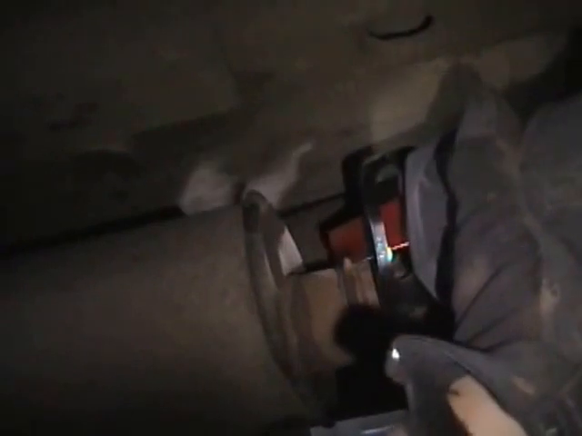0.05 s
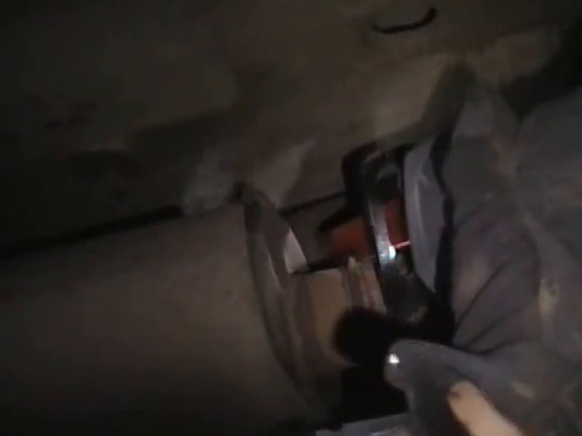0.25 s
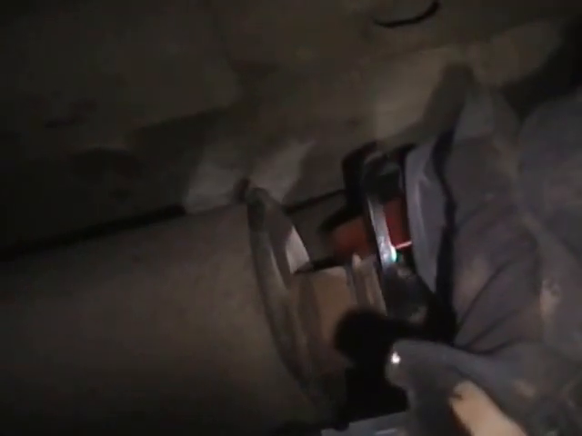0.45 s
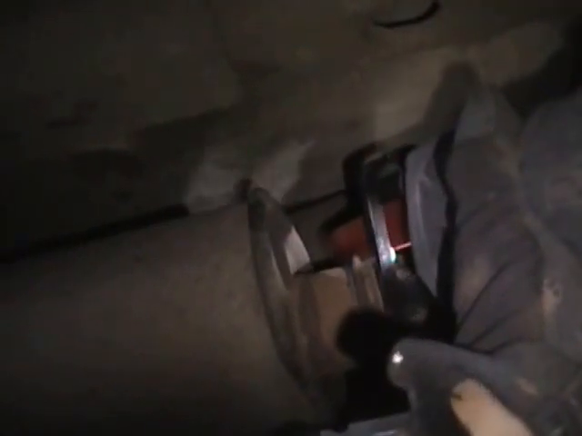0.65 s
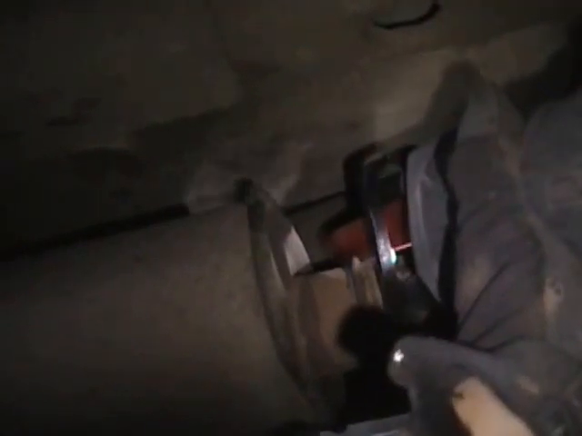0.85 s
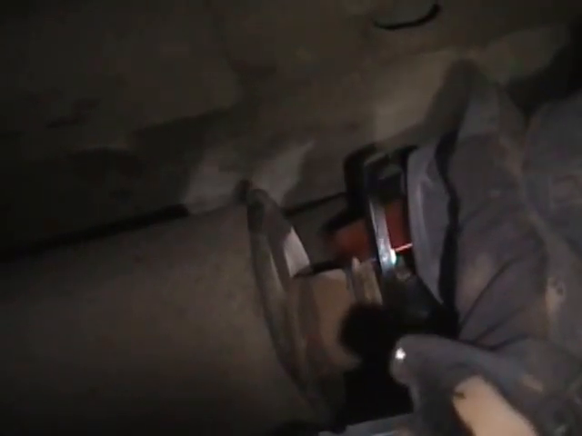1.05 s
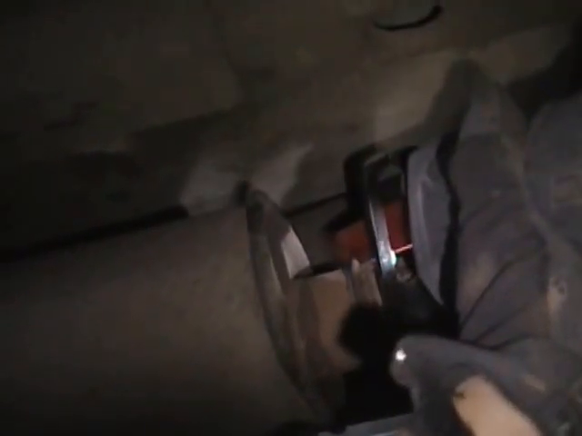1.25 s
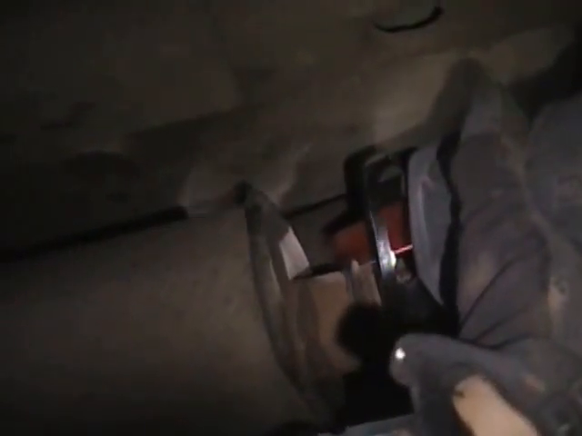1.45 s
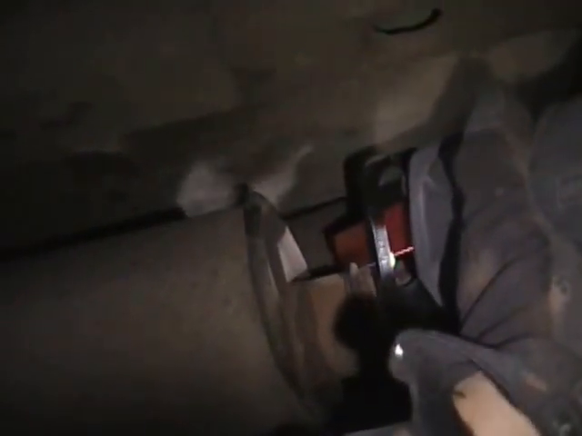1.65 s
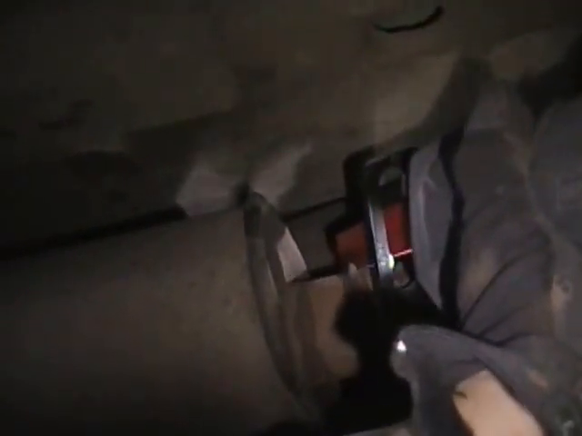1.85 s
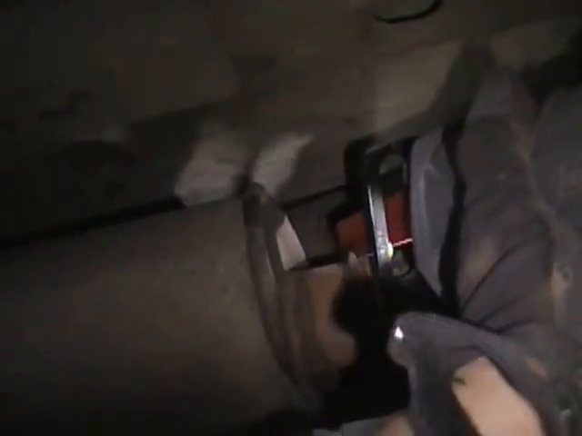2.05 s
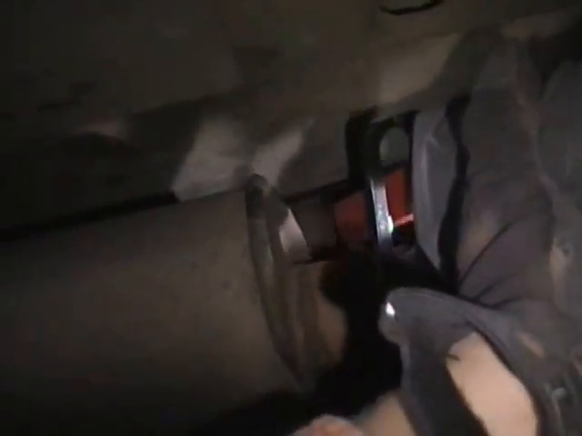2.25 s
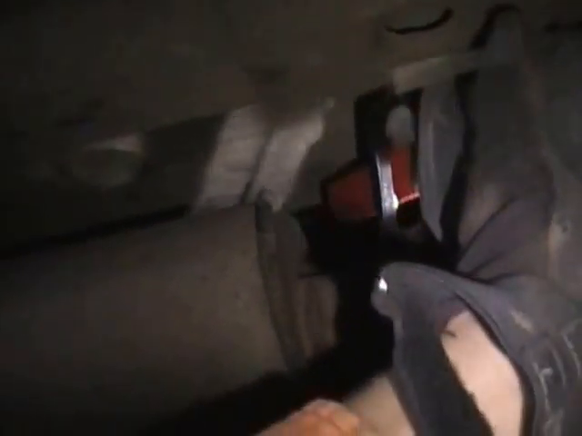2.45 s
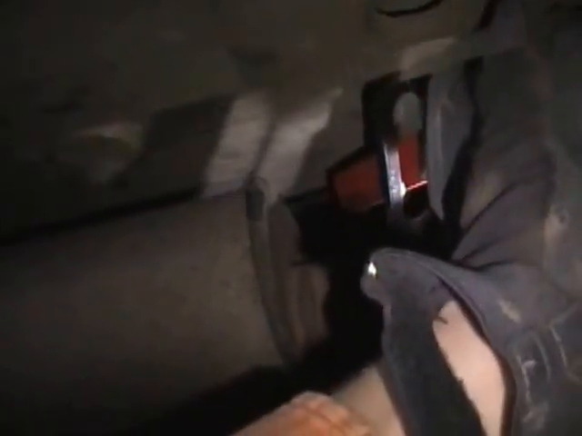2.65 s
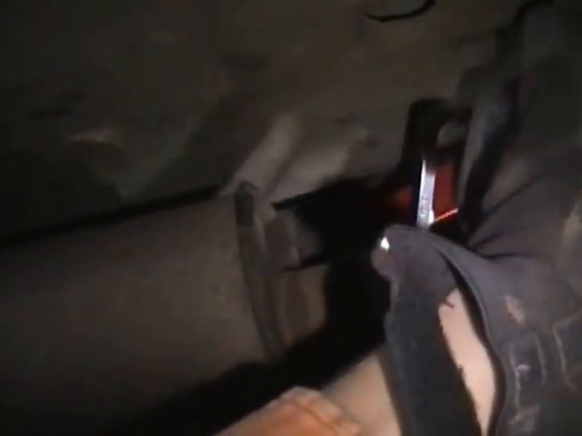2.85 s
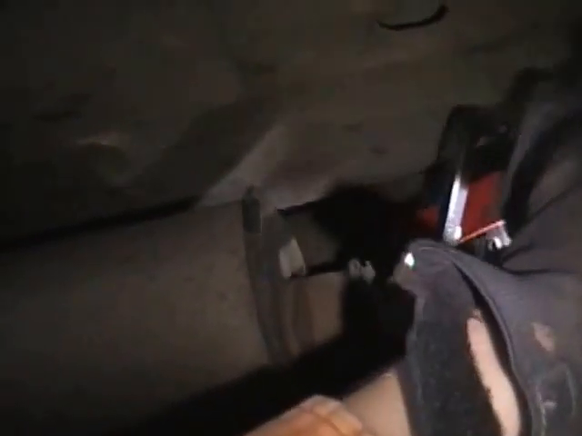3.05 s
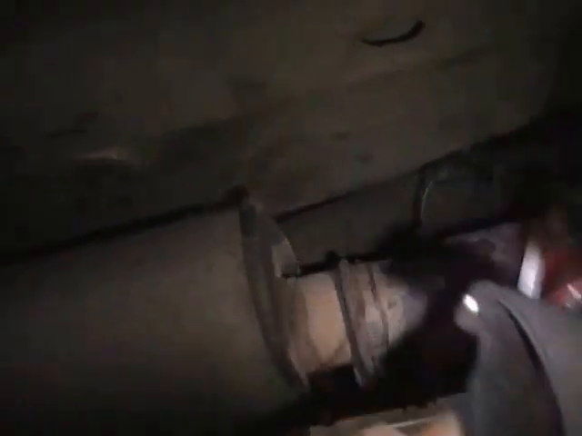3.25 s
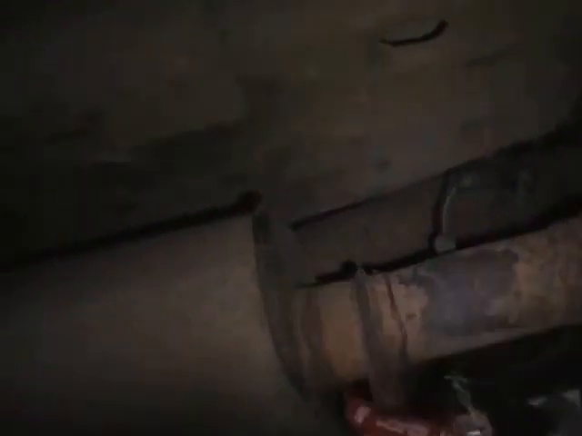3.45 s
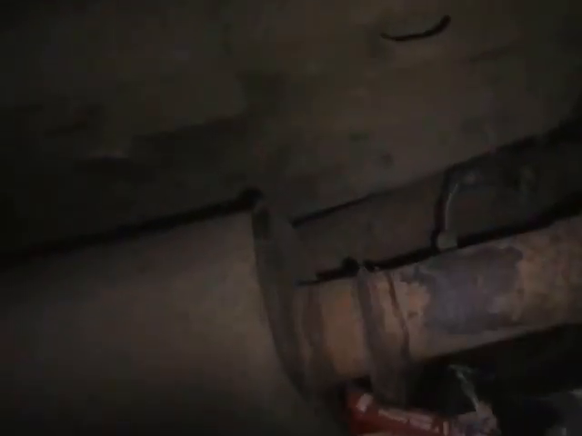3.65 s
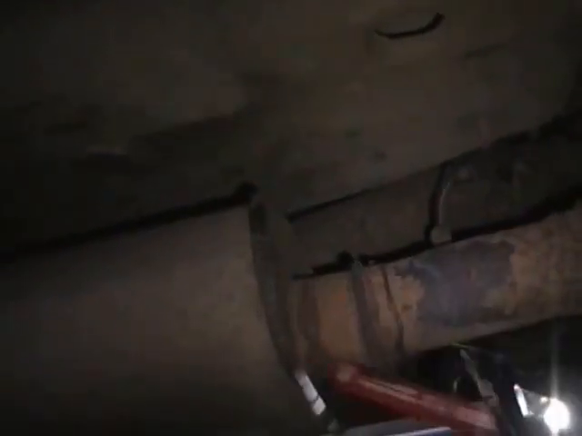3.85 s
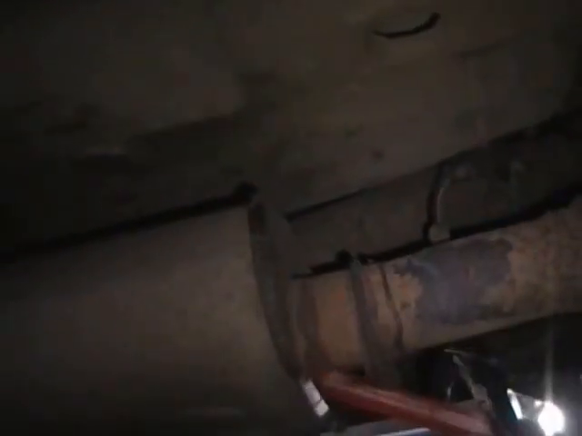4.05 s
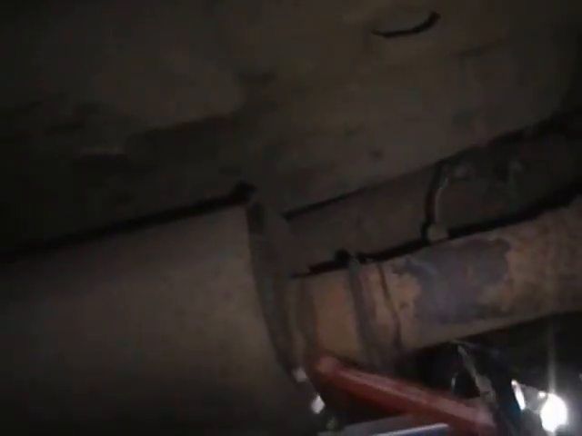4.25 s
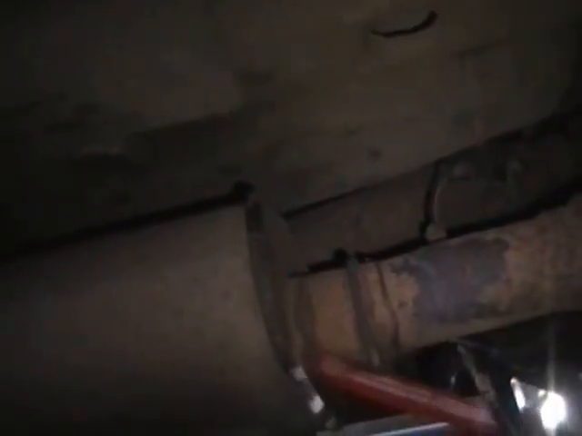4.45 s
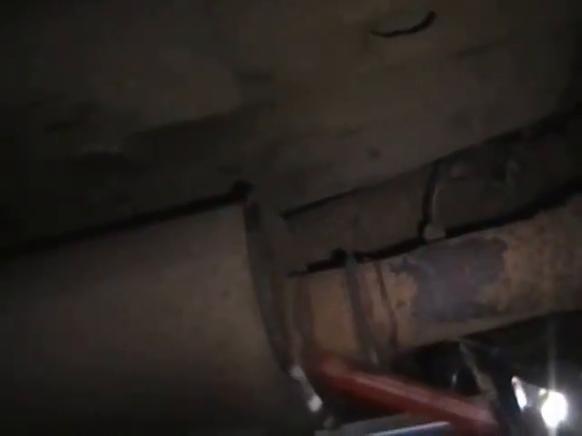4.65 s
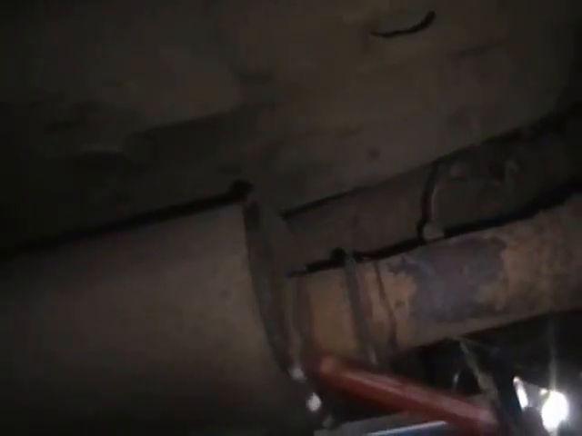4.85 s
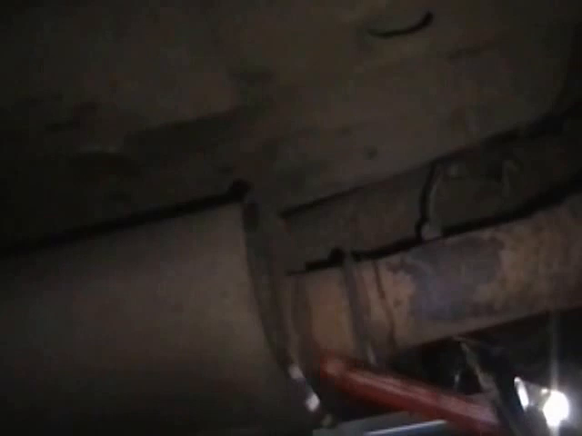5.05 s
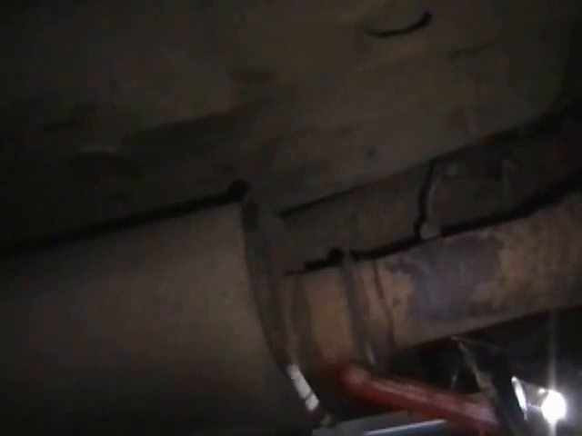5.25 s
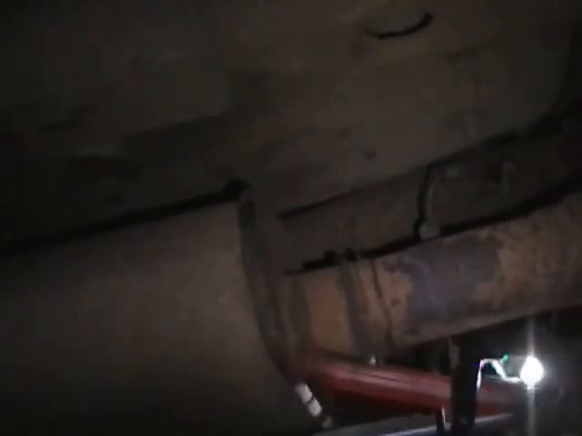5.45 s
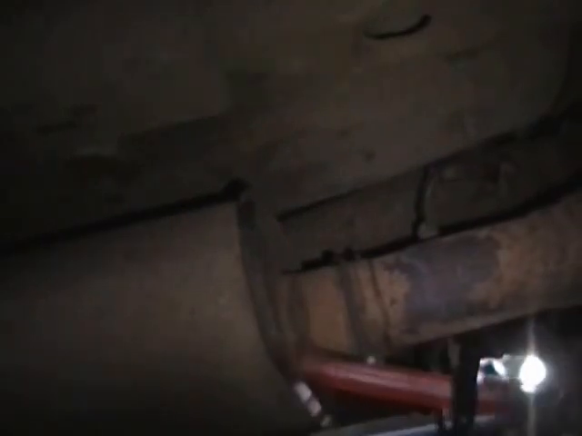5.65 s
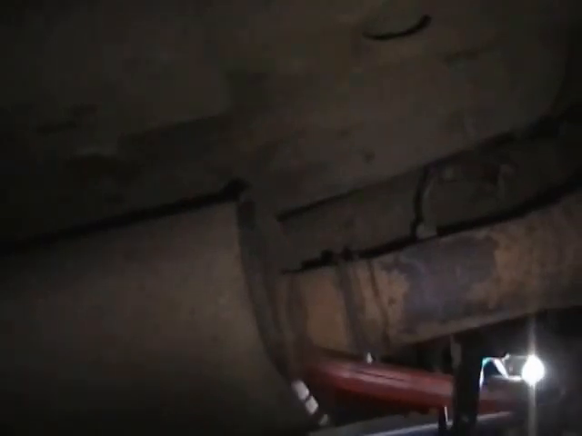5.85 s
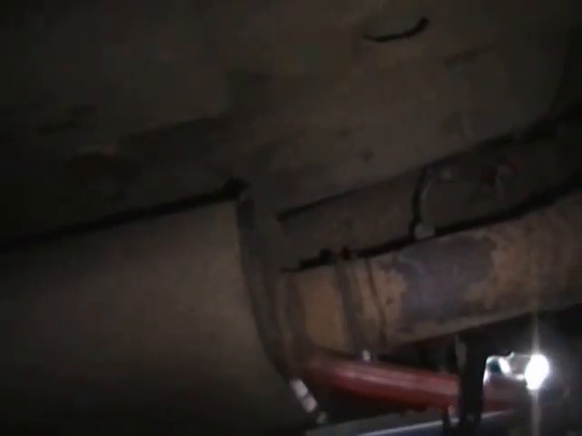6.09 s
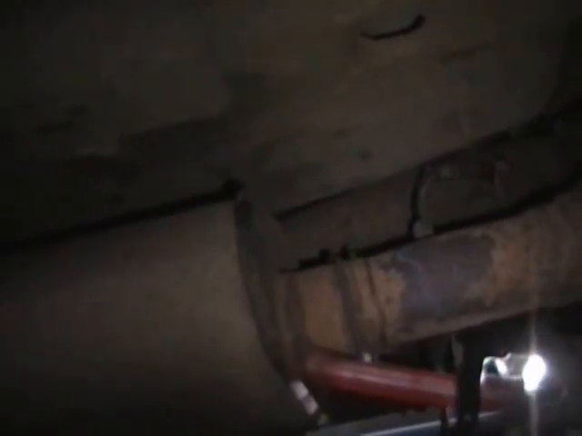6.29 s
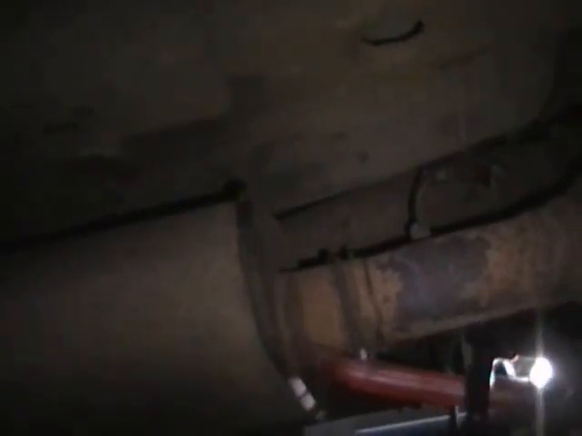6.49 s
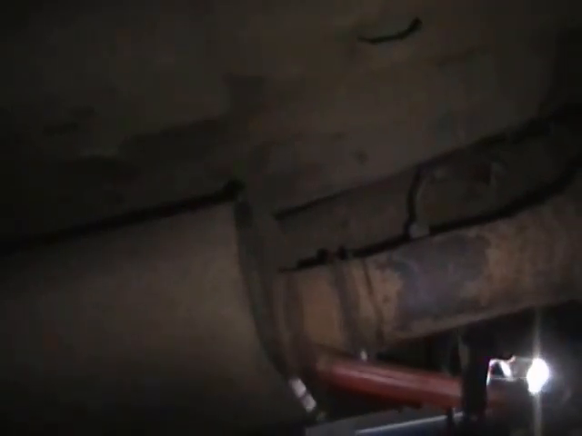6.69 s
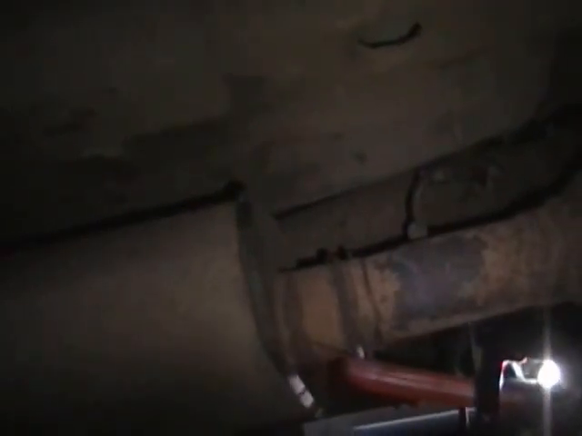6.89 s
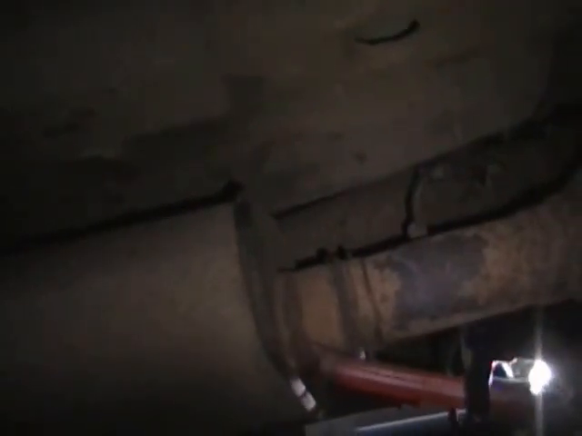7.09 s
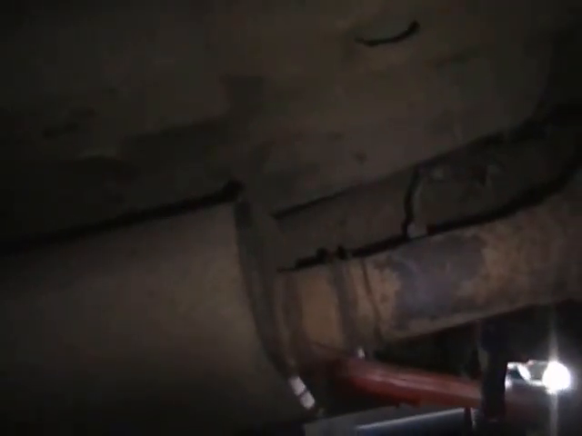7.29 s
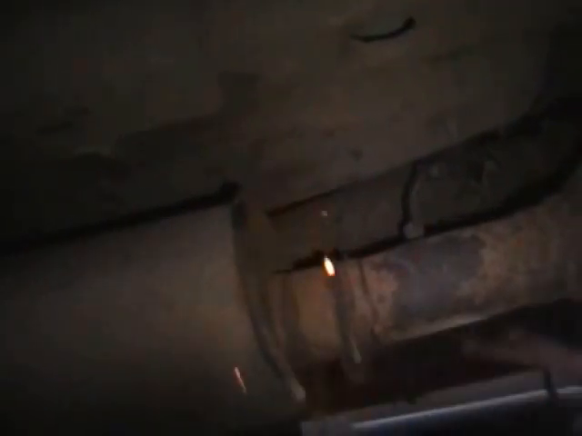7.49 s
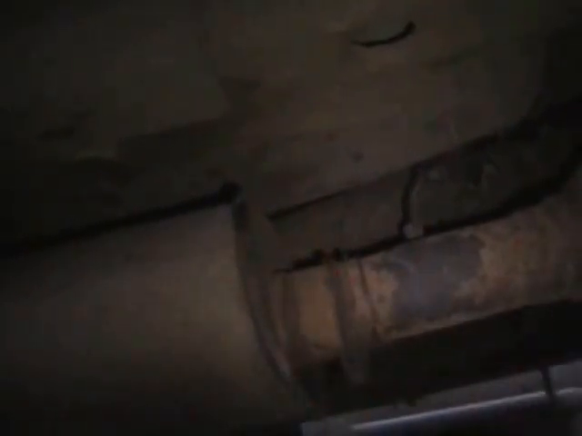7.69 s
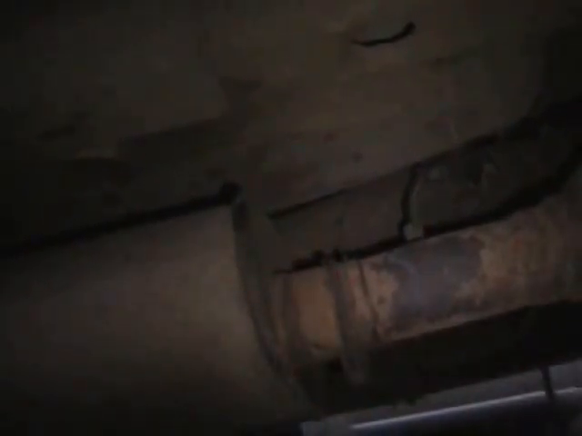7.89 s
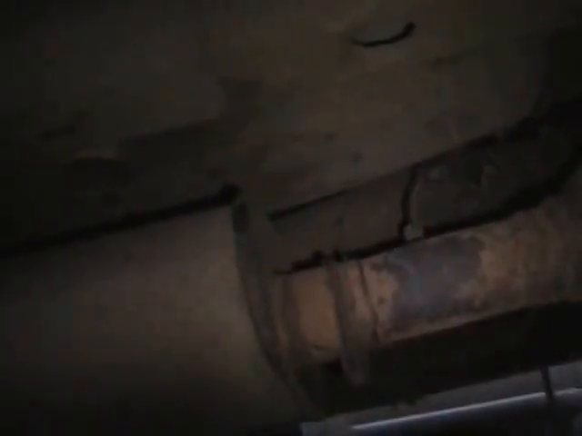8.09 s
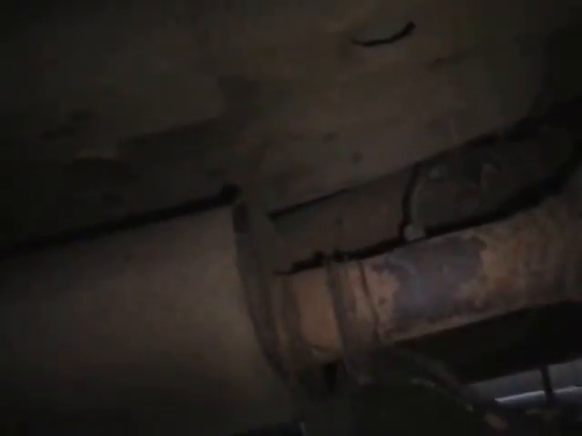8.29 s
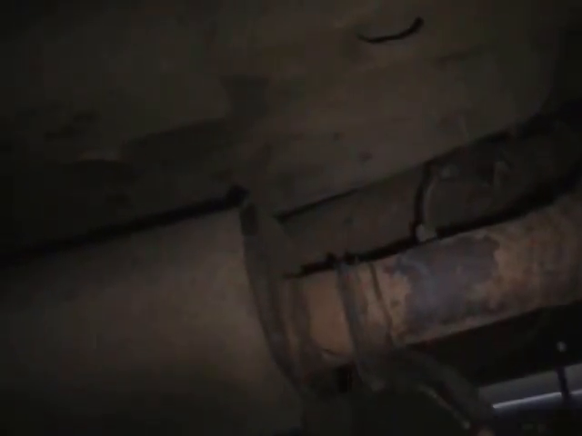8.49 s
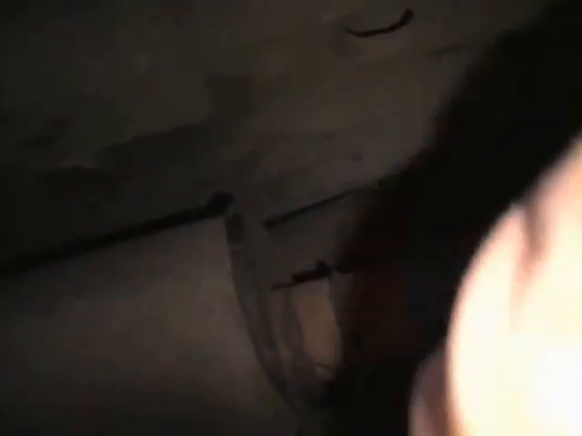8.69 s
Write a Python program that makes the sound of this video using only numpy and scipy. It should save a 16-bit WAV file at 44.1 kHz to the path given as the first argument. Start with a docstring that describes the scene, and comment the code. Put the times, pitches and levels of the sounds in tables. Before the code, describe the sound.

A reciprocating saw cuts an exhaust pipe, heard very near with short reflections from floor and underbody. A bright, buzzing rasp runs for over a second, then a brief second burst. After soft clothing rustles and small clinks, a thin motor whine brings clacking skips and separate raspy bites. A long full-throttle cut shakes the muffler, jolts and breaks through. The motor whirs down, with crumbling rust, scrapes and a loud clank last.

```python
"""Under a car on a garage floor, close up: a reciprocating saw cuts a rusty exhaust pipe.
One long and one short burst, a reset, single rasping strokes, then a race until the blade breaks through.
Stroke-shaped noise excites teeth, wall and muffler colours; the motor hums, whines and coasts down.
Knocks ring pipe modes, clothes rustle as shaped noise, floor and underbody throw the sound back."""
import sys
import numpy as np
from scipy import signal
from scipy.fft import rfft, irfft, next_fast_len
from scipy.io import wavfile
from scipy.ndimage import uniform_filter1d, map_coordinates

SR = 44100
rng = np.random.default_rng(int(sys.argv[2]) if len(sys.argv) > 2 else 0)


def wrap_up_sound(samples):
    """Save the sound to the file named by the first command line argument, as 16-bit audio."""
    columns = np.atleast_2d(samples).T
    # keep every value between -1 and 1, then stretch to whole-number steps
    tamed = np.clip(columns, -1, 1)
    steps = np.round(tamed * 32767).astype(np.int16)
    wavfile.write(sys.argv[1], SR, steps)


N = 384993

# Full-throttle runs: [trigger t/s, release t/s, peak of one pull t/s, coasting time constant/s,
# lift-off time to -60 dB/s]
RUN_FIRST = (0.22, 1.4714, 0.8945, 0.11, 0.13)
RUN_SHORT = (1.783, 2.005, 1.9417, 0.11, 0.13)
RUN_LAST = (5.485, 7.442, 6.4958, 0.17, 0.3)
# Crank rate at full speed: [t/s, f/Hz]
CRANK_FIRST = [(0.53, 42.35), (0.77, 41.08), (1.0, 41.98), (1.24, 41.59), (1.47, 42.23)]
CRANK_SHORT = [(1.85, 36.3), (2.03, 40.1)]
CRANK_LAST = [(5.75, 37.88), (5.93, 37.45), (6.12, 37.82), (6.49, 37.97), (6.68, 37.48), (6.86, 37.33),
              (7.05, 37.95), (7.23, 37.81), (7.42, 36.7)]
# Hand pressure on the cut: [t/s, level/dB]
PRESS_FIRST = [(0.28, -21), (0.446, -19), (0.526, -21), (1.21, -22), (1.22, -15.5), (1.24, -24),
               (1.46, -23)]
PRESS_SHORT = [(1.87, -21.5), (1.944, -18.5), (2.02, -20.5)]
PRESS_LAST = [(5.55, -17.5), (5.66, -20.5), (5.82, -20.5), (6.14, -23), (6.32, -20), (6.42, -23),
              (6.87, -22.5), (6.95, -19.5), (7.08, -22), (7.17, -19.5), (7.23, -23), (7.32, -21.5),
              (7.355, -16.5), (7.425, -20), (7.44, -25)]
# Colour of the teeth, at the surface, in slow strokes and deep in the cut: [f/Hz, level/dB]
TEETH_FIRST = [(1710, -47.5), (2900, 2), (3630, 3.5), (5010, -6.5), (5920, 4.5), (6430, -0.5), (7200, 3),
               (8250, 0.5), (9130, -1), (9860, -10.5), (10600, -11), (11600, -31), (12000, -44.5),
               (15600, -64), (22000, -120)]
TEETH_SLOW = [(120, -65), (200, -64.5), (445, -18), (694, -11), (1360, -11), (1540, -11), (1850, -3.5),
              (2500, 3), (2780, -5), (3200, -2), (4910, -5.5), (6750, 6.5), (10900, -14.5), (12800, -45.5),
              (14000, -90.5)]
TEETH_LAST = [(1710, -54.5), (2900, 0.5), (3420, -3), (3720, 0.5), (4060, -4.5), (4420, 1), (4880, -1.5),
              (5490, 1.5), (7060, 3), (9060, -1), (11200, -15), (12400, -13.5), (14000, -49.5)]
# Pipe wall resonances, at the two places and when nearly cut through: [f/Hz, width/Hz, level/dB]
WALL_FIRST = [(1540, 330, -10.5), (1848, 100, -2), (1910, 190, -3), (2020, 36, 0.5), (2062, 130, 2.5),
              (2230, 180, -4), (2480, 174, -0.5), (2700, 98, -5.5), (2940, 170, -15)]
WALL_LAST = [(1394, 210, -6.5), (1885, 340, 1.5), (2207, 100, 4), (2375, 67, 6.5), (2580, 220, 5),
             (3020, 100, 4), (3200, 160, -4), (3740, 350, 3)]
WALL_THIN = [(1370, 260, -9), (1835, 167, -1), (2024, 140, -2), (2330, 250, -1.5), (2518, 120, 3.5),
             (2690, 110, 3), (3030, 270, -6), (3320, 100, -9.5), (3800, 45, -5.5)]
# Colour of shaken muffler and saw housing: [f/Hz, level/dB]
SHUDDER = [(76, -62), (130, -52), (172, -44.5), (215, -19.5), (312, -4.5), (372, -0.5), (442, -3), (506, 1),
           (695, -0.5), (765, 1.5), (1000, 0), (1300, -3), (1690, -7), (2860, -120)]
# Dip in the shudder early in the last run: [f/Hz, width/Hz, level/dB]
SHUDDER_DIP = [(1065, 450, -5.5)]
# Hum partials: [multiple of crank rate, mean relative level/dB]
HUM = [(6, 1.5), (7, -12), (8, -1), (10, 5), (11, -4.5), (12, -3), (13, 0), (14, -3.5), (20, 5.5)]
# Hum against shudder: [t/s, level/dB]
HUM_LEVEL = [(2.1, -16), (5.5, -6.5), (5.65, -6), (6.06, -6.5), (6.16, -17), (6.47, -7.5), (6.61, -14),
             (6.8, -8), (7.0, -28.5), (7.19, -11), (7.42, -16)]
# Narrow resonances of the deepening cut: [start t/s, end t/s, f/Hz, width/Hz, level/dB]
SINGING = [(5.52, 6.02, 3625, 90, -35), (5.9, 6.42, 3770, 55, -34.5), (5.55, 6.1, 3186, 70, -38),
           (5.55, 6.45, 2655, 130, -37), (5.7, 6.45, 5650, 180, -36), (5.6, 5.95, 6950, 130, -32)]
# Squeals of the pinched blade: [start t/s, end t/s, f/Hz, width/Hz, level/dB]
SQUEALS = [(7.402, 7.413, 6900, 500, -24), (7.412, 7.427, 7300, 450, -17.5), (7.448, 7.46, 8800, 1500, -23)]
# Slow bites, long on the pull, short on the push:
# [start t/s, rise/s, length/s, relative level/dB, blade ring level/dB]
BITES = [(4.285, 0.0025, .033, -15, -21.5), (4.389, 0.0035, .012, -14, -29.5),
         (4.399, 0.0025, 0.017, -17, -27.5), (4.477, 0.0094, 0.018, -13.5, -25),
         (4.497, .004, .018, -19, -28), (4.537, 0.0018, .008, -19.5, -41.5),
         (4.573, 0.0048, .037, -16.5, -34.5), (4.627, .004, 0.026, -24.5, -32.5),
         (4.657, 0.0024, .015, -18, -28.5), (4.68, .004, 0.036, -18.5, -28),
         (4.73, 0.0051, .032, -20.5, -31.5), (4.774, .022, .04, -17, -25), (4.832, .002, 0.0087, -18, -35),
         (4.853, 0.0045, 0.02, -20, -34), (4.886, 0.0066, .034, -15.5, -28.5),
         (4.94, .003, 0.014, -24, -41), (4.962, .005, .025, -21.5, -30), (4.994, 0.016, 0.037, -15.5, -28),
         (5.069, 0.0024, 0.012, -17, -28.5), (5.084, 0.0027, .012, -23.5, -34.5),
         (5.113, .012, 0.03, -15, -29.5), (5.173, .003, .009, -25.5, -41), (5.191, .002, .014, -23, -37.5),
         (5.222, 0.025, 0.042, -17, -26), (5.28, .005, .036, -28, -42), (5.338, 0.015, 0.034, -15, -35),
         (5.308, 0.0034, .016, -25, -41.5), (5.385, .004, 0.013, -22, -39.5),
         (5.409, .002, 0.0095, -16.5, -36.5), (5.425, .012, .028, -14.5, -40),
         (5.465, .003, 0.0065, -14, -40.5), (5.479, .004, .012, -12, -41),
         (5.511, 0.0048, .013, -16.5, -44)]
# Blade resonances added to the slow teeth colour: [f/Hz, width/Hz, level/dB]
BLADE = [(470, 99, 14.5), (1370, 70, 13.5), (1865, 41, 10.5), (2550, 45, 5), (3210, 170, 6.5),
         (3775, 90, 10), (5750, 110, 3), (6400, 270, -2), (6860, 190, 1)]
# Blade ring after a bite: [f/Hz, width/Hz, relative level/dB]
BLADE_RING = [(2500, 120, -7), (3216, 160, 2), (3770, 130, -8.5)]
# Chatter, first skating, then cutting: [start t/s, end t/s, level/dB, growth/(dB/s)]
CHATTER = [(3.784, 4.286, -39.5, 11.5), (4.287, 4.567, -35, 6), (4.574, 5.513, -30, -2)]
# Colour of the chatter: [f/Hz, level/dB]
CHATTER_COLOUR = [(71, -57), (120, -50), (292, -15), (459, 0.5), (670, -7.5), (997, -3.5), (1690, -1.5),
                  (2160, 4.5), (2980, -1.5), (3220, -5.5), (3540, -6), (4040, -2), (4520, -8.5),
                  (7400, -6.5), (11000, -24.5), (14300, -71.5), (22000, -120)]
# Speed control at part throttle: [start t/s, end t/s, f/Hz, relative level/dB]
WHINE = [(0.215, 0.269, 1936, -46.5), (0.217, 0.271, 3960, -54), (3.777, 3.831, 2030, -40),
         (3.78, 4.3, 3900, -41.5), (4.306, 4.5, 3880, -50), (3.8, 4.297, 7940, -66),
         (3.92, 4.258, 7340, -49.5)]
# Skips of the blade before it catches: [t/s, relative level/dB]
SKIPS = [(3.843, -27.5), (3.889, -26.5), (3.917, -28), (3.942, -28.5), (3.953, -23.5), (3.998, -24),
         (4.013, -28.5), (4.03, -26), (4.07, -23.5), (4.082, -26), (4.101, -35), (4.123, -21.5),
         (4.137, -29), (4.15, -28), (4.166, -28), (4.184, -22), (4.195, -33), (4.21, -23), (4.241, -21),
         (4.266, -22.5)]
# Colour of a skip: [f/Hz, level/dB]
SKIP_COLOUR = [(30, -90.5), (90, -56), (160, -15.5), (300, -10), (480, 2), (670, -8.5), (1000, 6),
               (1650, -10.5), (2160, 8.5), (2600, 4), (2950, -2.5), (3220, 7.5), (3600, -6.5),
               (4500, -16.5), (7400, -1), (11000, -31), (13000, -73.5)]
# Free motor run-downs: [loudest t/s, level/dB, t60/s]
RUN_DOWNS = [(1.57, -50.5, 0.3), (2.099, -65, 0.58), (7.502, -41, 0.52)]
# Colour of the free motor: [f/Hz, level/dB]
MOTOR_COLOUR = [(50, -69.5), (120, -35.5), (220, -14.5), (400, 0.5), (540, 1.5), (700, -15.5), (900, -14),
                (1500, -31.5), (4000, -59)]
# Knocks of saw and blade on the pipe: [t/s, relative level/dB, ring level re that/dB]
KNOCKS = [(1.216, -1.5, -18), (1.749, -43.5, -14), (1.806, -15.5, -26), (2.13, -38, -22), (2.277, -33, -16),
          (2.293, -38, -10), (2.377, -32.5, -25), (2.77, -14, -16), (2.785, -23, -16), (2.925, -31, -6),
          (3.355, -37, -7), (3.787, -19.5, 3.5), (7.336, -7, -12.5), (7.356, -11, -12), (7.378, -12.5, -10),
          (7.413, -16.5, -13), (7.452, -16.5, -6.5), (8.208, -37.5, -5), (8.365, 4, -13.5),
          (8.653, -28.5, 0)]
# Pipe modes rung by a knock: [f/Hz, mean relative level/dB, t60/s]
PIPE = [(440, -17, .16), (495, -15, .26), (822, -12, .13), (1290, -4, .11), (1420, -4, .13),
        (1620, -5, .08), (1810, -1, .075), (1990, -1, .065), (2200, -2, .06), (2450, 2, .07),
        (2660, 2, .07), (2850, 2, .06), (3050, -1, .05), (3270, -5, .05), (4150, -12, .04)]
# Colour of a knock's crack: [f/Hz, level/dB]
CRACK = [(100, -66.5), (200, -25.5), (500, -9.5), (800, -14.5), (1300, -11), (2000, 2), (2900, -1.5),
         (3300, -8), (4000, -12.5), (6100, -9), (8500, -13.5), (11300, -40.5), (13000, -79)]
# Thuds as the saw grabs, speeds up or the loose pipe drops: [t/s, bass level/dB, muffler shell level/dB]
KICKS = [(4.29, -57, -28), (5.527, -46, -31.5), (7.355, -56.5, -35.5), (7.423, -60, -39.5),
         (7.454, -52, -28), (7.483, -50.5, -39), (7.601, -66.5, -45)]
# Colour of a thud's bass: [f/Hz, level/dB]
KICK_COLOUR = [(25, -13), (60, -18), (110, -18.5), (160, 4), (260, 3.5), (500, -30), (1500, -91.5)]
# Single pipe modes ringing on: [start t/s, f/Hz, level/dB, t60/s]
LINGER = [(0, 691, -65.5, 0.94), (1.52, 840, -67.5, 1.4), (8.366, 1180, -44, 0.54)]
# Long modes of the severed pipe: [f/Hz, relative level/dB, t60/s]
AFTER_RING = [(467, -53, 2), (3100, -68, 2.8)]
# Colour of crumbling rust: [f/Hz, level/dB]
CRUMBS_COLOUR = [(100, -50), (1000, -18), (4000, -12), (7000, 0), (12000, -22)]
# Ticks and scratches of trigger, teeth, rust flakes and grit: [t/s, relative level/dB]
TICKS = [(0.197, -25), (1.658, -36), (1.749, -33), (1.804, -12), (2.132, -39), (2.22, -32), (2.234, -33),
         (2.262, -29.5), (2.292, -24), (2.311, -31), (2.329, -33), (2.392, -26), (3.219, -35), (3.838, -14),
         (3.984, -10), (4.049, -8), (4.105, -17), (4.167, -5), (4.582, -7), (4.662, -9.5), (5.058, -11),
         (7.676, -37), (7.693, -30), (7.706, -25), (7.779, -35), (7.819, -23), (7.831, -29), (7.883, -41),
         (7.917, -37), (7.966, -37.5), (8.079, -38), (8.095, -37), (8.161, -30), (8.206, -24), (8.229, -8),
         (8.234, -14), (8.257, -12), (8.262, -12), (8.297, -8), (8.314, -12), (8.357, -2), (8.513, -16),
         (8.585, -13), (8.645, -15), (8.703, -0.5)]
# Colour of a tick: [f/Hz, level/dB]
TICK_COLOUR = [(100, -35), (250, -21.5), (600, -6.5), (2300, -3.5), (4000, -5.5), (7000, 3.5), (9500, -5.5),
               (12500, -37), (14000, -65)]
# Rubs of drawn-out blade, shifted position, sleeves and faint fading saw hiss, slide over the floor:
# [full strength t/s, 20 dB rise/s, hold/s, 20 dB fall/s, hiss level/dB, body level/dB]
WITHDRAW = [(2.245, 0.028, .032, 0.051, -52, -49)]
SHIFT = [(3.355, 0.15, 0.416, .02, -57, -56.5)]
SLEEVE_AND_HISS = [(0.004, .01, .004, 0.059, -73, -60), (1.68, 0.087, 0.13, 0.045, -72.5, -73),
                   (2.377, 0.013, 0.006, 0.028, -55, -51.5), (2.819, 0.88, 0.11, 0.29, -56.5, -59),
                   (2.9, 0.036, 0.048, 0.06, -61, -56), (3.22, 0.089, .08, .1, -65.5, -70)]
SLIDE = [(8.208, .008, 0.14, 0.14, -41.5, -46), (8.232, 0.04, 0.0098, 0.044, -40, -52),
         (8.315, 0.046, .005, 0.0095, -34, -59), (8.39, 0.052, 0.0064, .17, -45, -45),
         (8.512, 0.056, .01, 0.039, -36, -50), (8.565, 0.024, .17, .1, -38.5, -47)]
# Colour of each: [f/Hz, level/dB]
WITHDRAW_COLOUR = [(120, -53), (200, -26), (838, -15), (1170, -40), (1320, -28), (1630, -12), (3000, -6.5),
                   (5330, -15), (7310, -4), (11700, -23), (13000, -45)]
SHIFT_COLOUR = [(35, -56), (60, -36), (156, -8.5), (215, -12.5), (310, -2.5), (437, -7), (536, -6),
                (1040, -13.5), (1640, -5.5), (1970, -11.5), (6900, -5), (10900, -16), (12500, -34),
                (14000, -60.5)]
SLEEVE_AND_HISS_COLOUR = [(40, -31), (70, 0), (130, -2), (215, 0), (320, 6), (500, 1), (700, -0.5),
                          (1000, -5), (1500, -5), (2200, 3), (3100, -8.5), (4000, -10), (5000, -6),
                          (5700, -9.5), (7300, -6), (9700, -8.5), (12500, -26.5), (14000, -48)]
SLIDE_COLOUR = [(59, -64), (100, -40), (154, -6), (346, -1), (481, 4.5), (895, -1), (1850, 1.5),
                (4130, -7.5), (6930, -0.5), (8010, -2), (14000, -27)]
# Colour of the quiet garage: [f/Hz, level/dB]
BACKGROUND = [(25, -41), (110, -24.5), (230, -11), (420, -12.5), (600, -16), (780, -20.5), (1200, -25.5),
              (2200, -24.5), (3100, -23), (3500, -29), (7000, -28.5), (10000, -34), (14000, -57)]
# Stereo side against mid: [f/Hz, level/dB]
WIDTH = [(150, 0), (300, -19), (500, -15.5), (1000, -9.5), (2500, -19), (4500, -11), (6500, -14.5),
         (8500, -4), (12000, -3)]
# Garage decay: [f/Hz, t60/s]
GARAGE = [(200, 0.58), (1000, 0.34), (4000, 0.21), (10000, 0.064)]

SPIN_UP_S, BITE_POWER = .028, 4.26  # the cut grows with this power of the spin-up
PULL_SHARE = .62  # of a turn
CATCH_SHARE, EASE_POWER = .15, 1.6  # catching share of a stroke; steepness of easing off
THIN_S, THINNING_S, THIN_WALL_DB, THIN_SHUDDER_DB = 6.15, 0.74, 3, -2  # little steel is left
BREAK_S, BREAKING_S, BREAK_SHUDDER_DB, BREAK_WALL_DB = 7.395, 0.023, 9, -1  # the blade breaks through
BITE_EASE_DB, LET_GO_S = 5.5, 0.006  # fall over one slow bite; release of the teeth
CRUMBS_DB, CRUMBS_FALL_DB_PER_S = -59, 32
TOP_HZ = 14100


def amp(db):
    """Decibels to amplitude."""
    return 10 ** (np.asarray(db) / 20)


def unit(x):
    """Scale to unit RMS."""
    return x / np.sqrt(np.mean(x ** 2) + 1e-20)


def noise():
    """White Gaussian noise."""
    return rng.standard_normal(N)


def clock():
    """Time axis in seconds."""
    return np.arange(N) / SR


def since(start_s):
    """Seconds gone by after start_s, zero before it."""
    return np.maximum(clock() - start_s, 0)


def over_time(points):
    """Linear curve through (t/s, value) points."""
    return np.interp(clock(), *np.transpose(points))


def along(points, hz):
    """Curve through (f/Hz, value) points on a log axis."""
    f, value = np.transpose(points)
    return np.interp(np.log(hz + 1), np.log(f + 1), value)


def wobble(rate_hz):
    """Smooth random curve with rate_hz knots a second."""
    knots = rng.standard_normal(int(N * rate_hz / SR) + 4)
    return map_coordinates(knots, [np.arange(N) * rate_hz / SR])


def gate(start_s, end_s, edge_s):
    """One between start and end, with linear edges."""
    t = clock()
    return np.clip(np.minimum(t - start_s, end_s - t) / edge_s + .5, 0, 1)


def add(track, s, sound):
    """Mix a sound in at time s."""
    part = track[round(s * SR):][:len(sound)]
    part += sound[:len(part)]


def filtered(x, response):
    """Zero-phase filter by a gain over frequency."""
    m = next_fast_len(N + SR // 2)
    return irfft(rfft(x, m) * response(np.fft.rfftfreq(m, 1 / SR)), m)[..., :N]


def coloured(x, spectrum):
    """Filter by a (f/Hz, level/dB) table."""
    return filtered(x, lambda hz: amp(along(spectrum, hz)))


def high_pass(x, corner_hz, order):
    """Remove the bass; -6 dB about the corner."""
    return filtered(x, lambda hz: 1 / (1 + (corner_hz / (hz + 1)) ** order))


def low_pass(x, corner_hz, order):
    """Remove the treble; -6 dB at the corner."""
    return filtered(x, lambda hz: 1 / (1 + (hz / corner_hz) ** order))


def resonances(modes, hz):
    """Power sum of overlapping modes with steep skirts."""
    return np.sqrt(sum(amp(db) ** 2 / (1 + (1.87 * (hz - c) / w) ** 2) ** 2 for c, w, db in modes))


def bumps_db(modes, hz):
    """Sum of bell-shaped boosts or cuts, in dB."""
    return sum(db / (1 + (2 * (hz - c) / w) ** 2) for c, w, db in modes)


def grit(rate_hz, depth_db):
    """Noise broken into grains of random strength."""
    return unit(noise() * amp(depth_db * wobble(rate_hz)))


def ringing(x, t60_s, share):
    """Part of the power lingers in countless close modes, whose mix shifts as things move."""
    t = np.arange(SR // 8) / SR
    tails = rng.standard_normal((2, len(t))) * amp(-60 * t / t60_s)
    a, b = signal.fftconvolve(x[None], tails / np.linalg.norm(tails[0]), axes=1)[:, :N]
    drift = 2 * wobble(25)
    return np.sqrt(1 - share) * x + np.sqrt(share) * (np.cos(drift) * a + np.sin(drift) * b)


def restless(x, depth_db):
    """The blade never lies twice the same way: each band swells and sinks on its own."""
    z = signal.stft(x, nperseg=512)[2]
    field = uniform_filter1d(rng.standard_normal(z.shape), size=7, axis=0)
    field = uniform_filter1d(field, size=4, axis=1)
    gain = unit(amp(depth_db * unit(field)))
    return signal.istft(z * gain, nperseg=512)[1][:N]


def bite(turns, push_db, drag, scatter_db, ripple):
    """Teeth catch at each reversal and ease off: long pull, shorter push; the gears add a ripple."""
    cycle, phase = np.divmod(turns, 1)
    pushing = phase > PULL_SHARE
    progress = np.where(pushing, (phase - PULL_SHARE) / (1 - PULL_SHARE), phase / PULL_SHARE)
    stroke = (2 * (cycle - cycle.min()) + pushing).astype(int)
    stroke_db = scatter_db * rng.standard_normal(stroke.max() + 1)
    force = amp(stroke_db[stroke] + push_db * pushing)
    catch = np.minimum(progress / CATCH_SHARE, 1)
    ease = np.abs(np.cos(np.pi * progress / 2)) ** EASE_POWER
    gear = np.cos(2 * np.pi * 6 * turns)
    return unit((drag + force * catch * ease) * (1 + ripple * gear))


def steady(x, running):
    """Unit deviation while the saw runs."""
    return x / np.std(x[running])


def thinning():
    """Progress from whole to thin wall, 0 to 1."""
    return np.minimum(since(THIN_S) / THINNING_S, 1)


def breaking():
    """Progress of the break-through, 0 to 1."""
    return np.minimum(since(BREAK_S) / BREAKING_S, 1)


def scraped_wall(scrape, wall_modes, running):
    """Scraping rings the wall; its modes cross-fade as steel runs out, and weaken at the break."""
    whole = steady(filtered(scrape, lambda hz: resonances(wall_modes, hz)), running)
    thinned = steady(filtered(scrape, lambda hz: resonances(WALL_THIN, hz)), running)
    thin = thinning()
    return ((1 - thin) * whole + amp(THIN_WALL_DB) * thin * thinned) * amp(BREAK_WALL_DB * breaking())


def shaken_body(turns, trigger, release, ripple, running):
    """Strokes shake muffler and housing, which also hum at multiples of the crank rate."""
    shaking = grit(720, depth_db=0.5) * bite(turns, push_db=-1, drag=4.0, scatter_db=2.5, ripple=ripple)
    shudder = steady(coloured(shaking, SHUDDER), running)
    dipped = filtered(shudder, lambda hz: amp(bumps_db(SHUDDER_DIP, hz)))
    shudder = shudder + (dipped - shudder) * gate(RUN_LAST[0], THIN_S + THINNING_S / 2, edge_s=0.22)
    slip = turns + 0.028 * wobble(30)
    hum = sum(amp(db + 3 * wobble(24)) * np.sin(2 * np.pi * order * slip) for order, db in HUM)
    hum_gain = amp(over_time(HUM_LEVEL)) * gate(trigger, release, edge_s=0.027)
    return (shudder + hum_gain * steady(hum, running)) / np.hypot(1, hum_gain)


def fast_run(run, rates, press, teeth_colour, wall_modes, teeth_db, wall_db, shudder_db,
             push_db, wall_push_db, drag, wall_drag, ripple, lead):
    """Strokes rasp through the wall and shake the exhaust; lead/turns sets pull start before its peak."""
    trigger, release, pull_s, coast_s, lift_s = run
    spun_up = 1 - np.exp(-since(trigger) / SPIN_UP_S)
    speed = spun_up * np.exp(-since(release) / coast_s)
    turns = np.cumsum(over_time(rates) * speed) / SR
    turns = turns - np.interp(pull_s, clock(), turns) + lead
    running = gate(trigger + SPIN_UP_S, release, edge_s=.01) > .5
    press_db = over_time(press)
    force = spun_up ** BITE_POWER * amp(press_db - 60 * (since(release) / lift_s) ** 2)

    teeth = grit(1200, depth_db=1.5) * bite(turns, push_db, drag, scatter_db=1.0, ripple=ripple)
    teeth = coloured(ringing(teeth, t60_s=0.069, share=0.1), teeth_colour)
    teeth = steady(restless(teeth, depth_db=1.5), running)
    scrape = grit(830, depth_db=1.5) * bite(turns, wall_push_db, wall_drag, scatter_db=2.0, ripple=ripple)
    wall = scraped_wall(restless(scrape, depth_db=1.5), wall_modes, running)
    body = shaken_body(turns, trigger, release, ripple, running)

    # shaking: cube of speed, a little of pressure, less through thin wall, more once broken
    shaking_db = shudder_db + 1.1 * (press_db - press_db[running].mean())
    shaking_db = shaking_db + THIN_SHUDDER_DB * thinning() + BREAK_SHUDDER_DB * breaking()
    shaking = speed ** 3 * spun_up * amp(shaking_db)
    return force * (amp(teeth_db) * teeth + amp(wall_db) * wall) + shaking * body


def fast_runs():
    """Three full-throttle cuts, with little below 150 Hz."""
    saw = fast_run(RUN_FIRST, CRANK_FIRST, PRESS_FIRST, TEETH_FIRST, WALL_FIRST,
                   teeth_db=-3.0, wall_db=-3.5, shudder_db=-37.0, push_db=-11, wall_push_db=-4.0,
                   drag=0.9, wall_drag=1.4, ripple=0.061, lead=.17)
    saw += fast_run(RUN_SHORT, CRANK_SHORT, PRESS_SHORT, TEETH_FIRST, WALL_FIRST,
                    teeth_db=-3.5, wall_db=-5.0, shudder_db=-37.0, push_db=-11.0, wall_push_db=-7.0,
                    drag=1.0, wall_drag=1.4, ripple=0.18, lead=0.14)
    saw += fast_run(RUN_LAST, CRANK_LAST, PRESS_LAST, TEETH_LAST, WALL_LAST,
                    teeth_db=-2.06, wall_db=-9.5, shudder_db=-37.5, push_db=-7.0, wall_push_db=-0.5,
                    drag=0.5, wall_drag=1.1, ripple=0.068, lead=0.122)
    return high_pass(saw, 150, order=6)


def stroke_drive(saw):
    """Rasp strength over 5 ms against its 100 ms mean."""
    def power(size):
        return np.abs(uniform_filter1d(saw ** 2, size=size)) + 1e-12
    return np.sqrt(power(220) / power(4400))


def singing(notes, edge_s):
    """Narrow resonances of blade and cut sing as gated bands of noise."""
    track = np.zeros(N)
    for start, end, centre, width, db in notes:
        band = unit(filtered(noise(), lambda hz: resonances([(centre, width, 0)], hz)))
        track += band * amp(db) * gate(start, end, edge_s)
    return track


def bite_forces(ring_t60_s=0.089):
    """Each slow bite digs in, eases and lets go; the blade's ring outlasts it."""
    force, ring, t = np.zeros(N), np.zeros(N), np.arange(SR // 6) / SR
    for s, rise, length, db, ring_db in BITES:
        dig = np.minimum(t / rise, 1) ** 0.77
        let_go = np.clip((length - t) / LET_GO_S + .5, 0, 1)
        add(force, s, dig * amp(db + 1.5 - BITE_EASE_DB * t / length) * let_go)
        add(ring, s, dig * amp(ring_db - 60 * np.maximum(t - length, 0) / ring_t60_s))
    return force, ring


def slow_rasp():
    """Single bites rasp with the blade's colour and leave it ringing."""
    def blade(hz):
        return amp(along(TEETH_SLOW, hz) + bumps_db(BLADE, hz))
    teeth = grit(600, depth_db=2.0)
    force, ring_force = bite_forces()
    rasp = ringing(filtered(teeth * force, blade), t60_s=0.098, share=0.23)
    rasp = rasp / np.std(filtered(teeth, blade))
    ring = unit(filtered(noise(), lambda hz: resonances(BLADE_RING, hz))) * ring_force
    return restless(rasp + ring, depth_db=1.9)


def chatter():
    """The loose blade rattles in its groove at an uneven rate around 46 Hz."""
    rattles = np.cumsum(46 * amp(3.0 * wobble(30))) / SR
    hits = grit(930, depth_db=1.0) * amp(-10 * (rattles % 1))
    clatter = unit(coloured(ringing(hits, t60_s=.045, share=0.44), CHATTER_COLOUR))
    level = np.zeros(N)
    for start, end, db, growth in CHATTER:
        level += gate(start, end, edge_s=0.023) * amp(db + growth * np.minimum(since(start), end - start))
    return clatter * level


def whine():
    """The speed control sings in steady tones at part throttle."""
    tones = np.zeros(N)
    for start, end, hz, db in WHINE:
        tones += amp(db + 1) * gate(start, end, edge_s=0.011) * np.sin(2 * np.pi * hz * clock())
    return tones * amp(0.6 * wobble(31))


def jolt():
    """The saw's starting jolt rings the muffler shell at 511 Hz."""
    t = since(3.788)
    envelope = amp(-27 - 60 * t / .22) * np.minimum(t / .003, 1)
    return envelope * np.sin(2 * np.pi * 511 * t + .8 * wobble(150))


def crawl():
    """Slow strokes: rasp and chatter without bass, plus jolt and whine."""
    return high_pass(slow_rasp() + chatter(), 300, order=6) + jolt() + whine()


def skips(attack_s=0.0013, t60_s=0.066):
    """Each skip of the teeth over the pipe is a short, coarse clack."""
    shape, t = np.zeros(N), np.arange(SR // 8) / SR
    for s, db in SKIPS:
        add(shape, s, np.minimum(t / attack_s, 1) * amp(db - 2.5 - 60 * t / t60_s))
    teeth = grit(960, depth_db=0.0)
    return coloured(shape * teeth, SKIP_COLOUR) / np.std(coloured(teeth, SKIP_COLOUR))


def run_downs(whirr_hz=70, slowing_s=0.072, rise_s=0.067):
    """With the trigger let go, the gears whirr ever more slowly."""
    track, t = np.zeros(N), np.arange(SR // 2) / SR
    beats = whirr_hz * slowing_s * (1 - np.exp(-t / slowing_s))
    whirr = 1 + 0.38 * np.cos(2 * np.pi * beats)
    for s, db, t60 in RUN_DOWNS:
        shape = np.minimum(t / rise_s, 1) * amp(db - 60 * np.maximum(t - rise_s, 0) / t60)
        add(track, s - rise_s, shape * whirr)
    return track * unit(coloured(noise(), MOTOR_COLOUR))


def knocks(looseness=0.05, crack_t60_s=0.03):
    """Each blow is a noise crack plus pipe modes, blurred by the rattling joints."""
    t = np.arange(SR // 2) / SR
    cracks, rings = np.zeros(N), np.zeros(N)
    mode_hz, mode_db, t60 = np.transpose(PIPE)[:, :, None]
    decay = amp(mode_db - 60 * t / t60) * (1 - np.exp(-t / 0.0038))
    for s, db, ring_db in KNOCKS:
        # random phase walk, wider for higher modes
        blur = looseness * np.sqrt(mode_hz / 1000) * np.cumsum(rng.standard_normal(decay.shape), axis=1)
        strength = amp(rng.normal(0, 1.9, mode_hz.shape))
        ring = np.sum(strength * decay * np.sin(2 * np.pi * mode_hz * t + blur), axis=0)
        add(rings, s, amp(db + ring_db) * ring / np.abs(ring).max())
        add(cracks, s, amp(db - 2.0) * rng.standard_normal(len(t)) * amp(-60 * t / crack_t60_s))
    return high_pass(coloured(cracks, CRACK) + low_pass(rings, 5000, order=4), 130, order=4)


def kicks(rise_s=0.0059, bass_t60_s=0.27, shell_t60_s=0.17):
    """Dull thuds of the whole exhaust: a low push and a rattle of the muffler shell."""
    bass = unit(coloured(noise(), KICK_COLOUR))
    shell = unit(coloured(noise(), SHUDDER))
    track = np.zeros(N)
    for s, bass_db, shell_db in KICKS:
        t = since(s)
        thud = bass * amp(bass_db - 60 * t / bass_t60_s) + shell * amp(shell_db - 60 * t / shell_t60_s)
        track += np.minimum(t / rise_s, 1) * thud
    return track


def lingering():
    """Single pipe modes ring on faintly with a wavering phase."""
    track = np.zeros(N)
    for s, hz, db, t60 in LINGER:
        envelope = np.minimum(since(s) / 0.003, 1) * amp(db - 60 * since(s) / t60)
        track += envelope * np.sin(2 * np.pi * hz * clock() + .5 * wobble(60))
    return track


def freed_pipe(start_s=7.6):
    """Once cut through, the pipe rings on while rust crumbles off it."""
    t = since(start_s)
    ring = sum(amp(db - 4.0 - 60 * t / t60) * np.sin(2 * np.pi * hz * t) for hz, db, t60 in AFTER_RING)
    crumbs = unit(coloured(grit(640, depth_db=6.5), CRUMBS_COLOUR))
    crumbs *= amp(CRUMBS_DB - CRUMBS_FALL_DB_PER_S * t) * gate(start_s, 8.2, edge_s=.02)
    return ring + crumbs


def ticks(attack_s=0.0011, t60_s=0.011):
    """Light contacts die within a few milliseconds."""
    t, track = np.arange(SR // 10) / SR, np.zeros(N)
    for s, db in TICKS:
        shape = np.minimum(t / attack_s, 1) * amp(-60 * t / t60_s)
        add(track, s, amp(db - 8.0) * rng.standard_normal(len(t)) * shape)
    return coloured(track, TICK_COLOUR)


def rub(rubs, colour, grain_db, uneven_db):
    """Dull body and grainy hiss of soft noises; each rises, holds unevenly and falls."""
    grains = coloured(grit(580, depth_db=grain_db), colour)
    dull = low_pass(grains, 2900, order=8)
    hiss, body, track = unit(grains - dull), unit(dull), np.zeros(N)
    for s, rise, hold, fall, hiss_db, body_db in rubs:
        shape = amp(-20 * (np.maximum(s - clock(), 0) / rise + since(s + hold) / fall))
        track += shape * (amp(hiss_db) * hiss + amp(body_db) * body)
    return track * amp(uneven_db * wobble(35))


def handling():
    """Sleeves and faint fading saw hiss, floor slide, withdrawn blade, shifted position."""
    track = rub(SLEEVE_AND_HISS, SLEEVE_AND_HISS_COLOUR, grain_db=3.0, uneven_db=1.5)
    track += rub(SLIDE, SLIDE_COLOUR, grain_db=2.6, uneven_db=2.0)
    track += rub(WITHDRAW, WITHDRAW_COLOUR, grain_db=4, uneven_db=5.0)
    return track + rub(SHIFT, SHIFT_COLOUR, grain_db=2.0, uneven_db=2.0)


def background():
    """Quiet garage as steady coloured noise."""
    return amp(-75.5) * unit(coloured(noise(), BACKGROUND))


def garage(x):
    """A short noise tail in each ear; the treble dies first."""
    hz, t, z = signal.stft(rng.standard_normal((2, SR // 2)), SR, nperseg=256)
    tail = signal.istft(z * amp(-60 * t / along(GARAGE, hz)[:, None]), SR, nperseg=256)[1]
    return signal.fftconvolve(x[None], tail / np.linalg.norm(tail[0]), axes=1)[:, :N]


def scene():
    """Saw, pipe and clothes close up, in the low space under the car."""
    saw = fast_runs()
    mid = saw + stroke_drive(saw) * singing(SINGING, edge_s=0.2) + singing(SQUEALS, edge_s=.004)
    mid += crawl() + skips() + run_downs()
    mid += knocks() + kicks() + lingering() + freed_pipe() + ticks()
    mid += handling() + background()
    # reflections off floor and underbody differ left and right
    side = coloured(ringing(mid, t60_s=0.012, share=1.0), WIDTH)
    balance = amp([[-.35], [.35]])
    return np.array([mid + side, mid - side]) * balance + amp(-13.5) * garage(mid)


def record(dry):
    """Round off the highest peaks, then cut everything from TOP_HZ up."""
    rounded = dry / (1 + np.abs(dry / .85) ** 8) ** (1 / 8)
    return filtered(rounded, lambda hz: hz < TOP_HZ)


dry = scene()
out = record(dry)
wrap_up_sound(out)
```